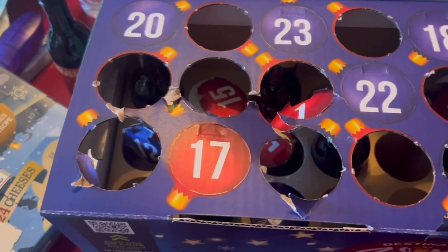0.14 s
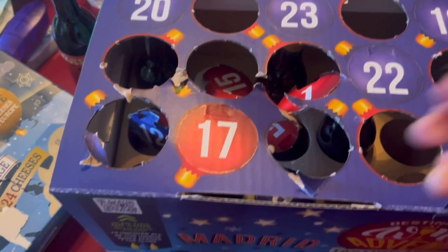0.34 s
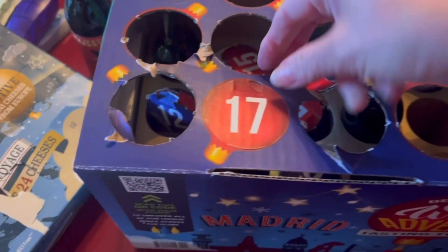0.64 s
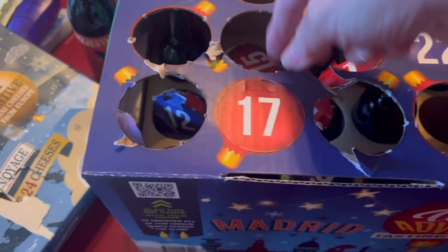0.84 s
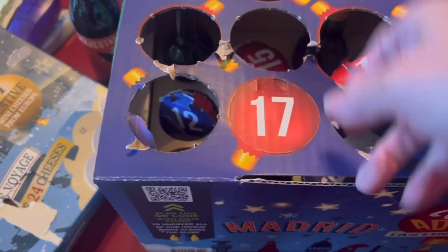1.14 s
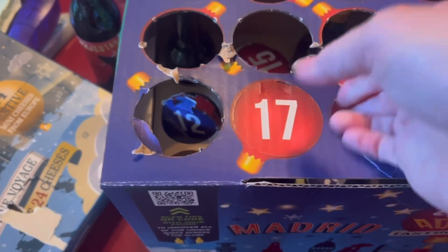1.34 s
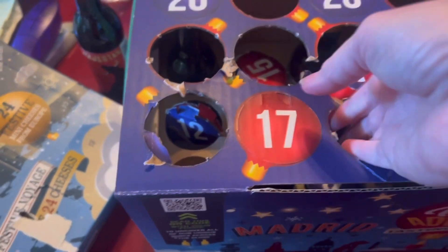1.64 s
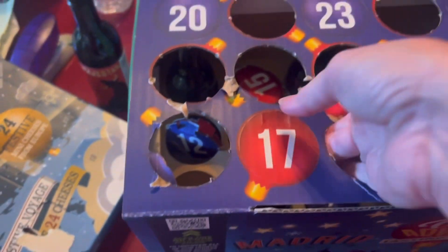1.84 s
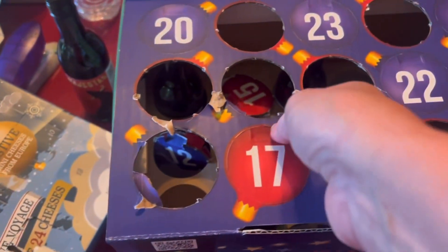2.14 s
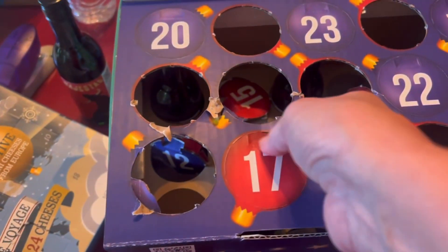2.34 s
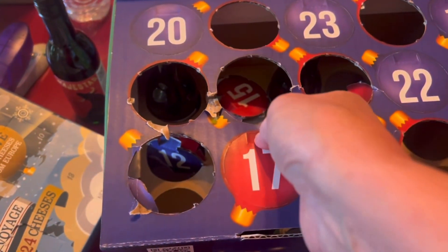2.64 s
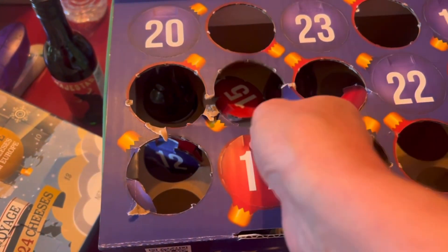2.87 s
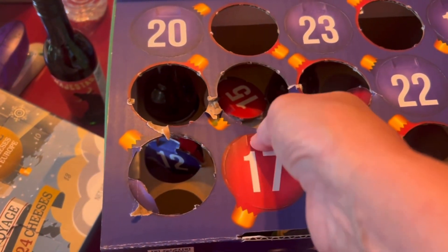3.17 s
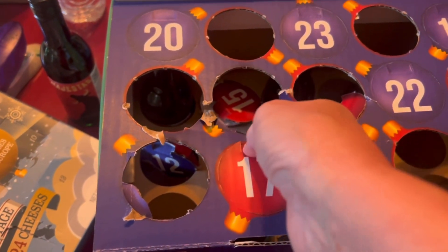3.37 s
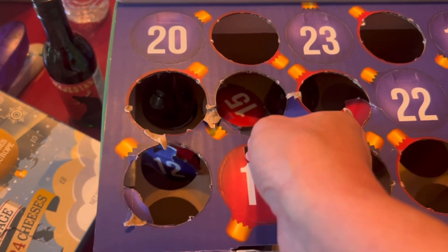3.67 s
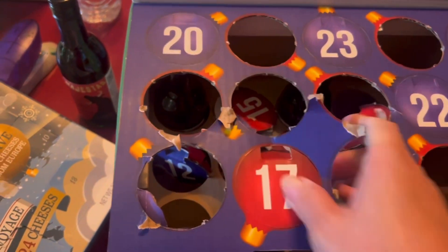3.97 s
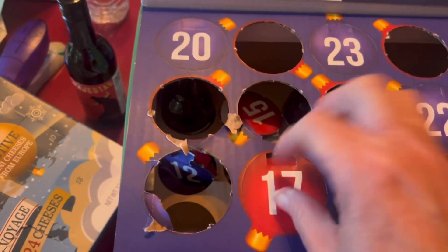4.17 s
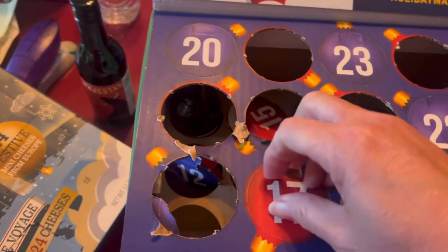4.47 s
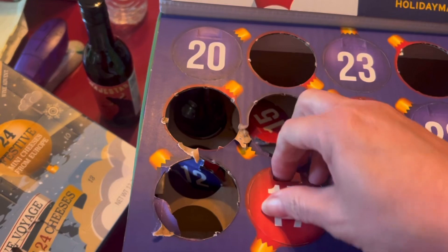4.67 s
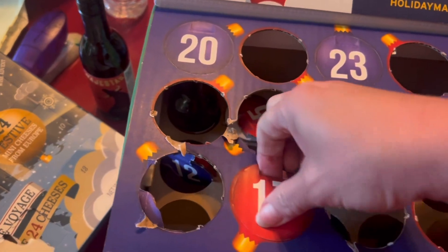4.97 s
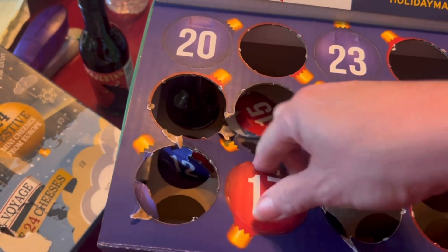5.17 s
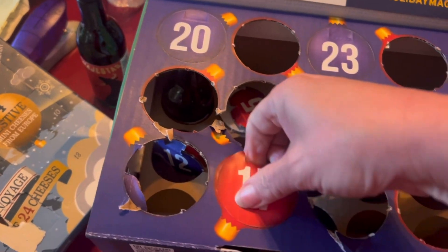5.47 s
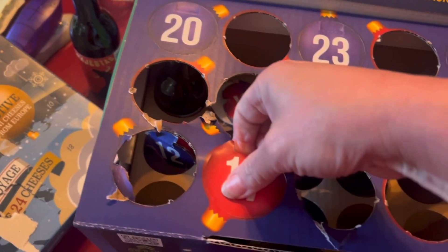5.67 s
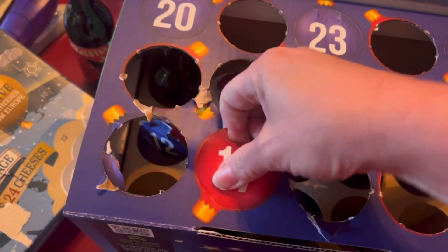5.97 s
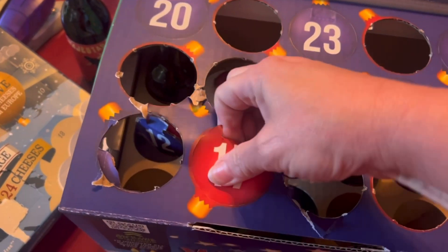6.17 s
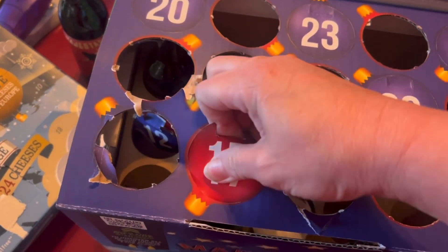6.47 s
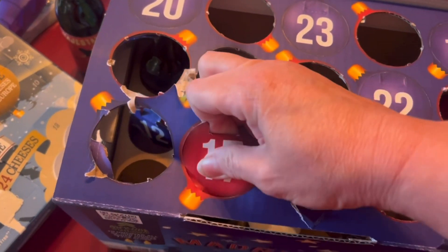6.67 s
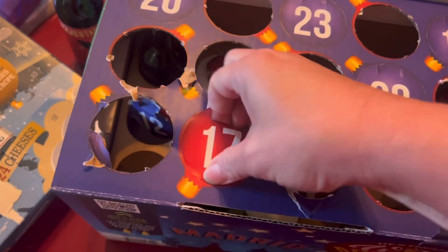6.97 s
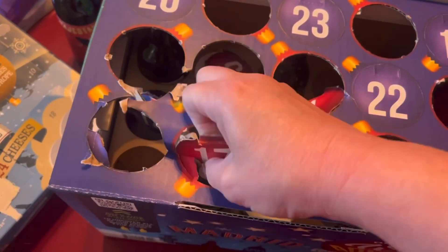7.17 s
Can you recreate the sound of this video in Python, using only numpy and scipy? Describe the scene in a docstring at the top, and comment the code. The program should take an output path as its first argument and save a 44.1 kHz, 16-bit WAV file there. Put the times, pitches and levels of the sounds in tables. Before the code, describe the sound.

Close-up picking at a stiff cardboard door: dry taps, papery scrapes, hollow thumps and tiny snaps, finishing in a sharp tearing burst.

```python
"""Fingers pick at the perforated door of a cardboard advent calendar, close to a phone in a small room.
Nails tick on the card and paper fibres snap, as noise bursts with a crack and a clack band.
Taps and pushes send falling bending waves through the hollow box, which rings and thumps.
Between the taps skin rubs, creaks and slides as random slips, and the perforation crackles,
until the door rips open at the end; a short room tail and a faint hush lie behind."""
import sys
import numpy as np
from scipy import signal
from scipy.fft import rfft, irfft, next_fast_len
from scipy.io import wavfile
from scipy.ndimage import map_coordinates

SR = 44100
rng = np.random.default_rng(int(sys.argv[2]) if len(sys.argv) > 2 else 0)


def transcribe(u):
    """Save the signal u as a 16-bit wav file named by the first command-line argument.

    u: samples, shape (n,) or (channels, n), limited to [-1, 1]; the rate is SR.
    q: integer samples, one column per channel.
    """
    v = np.clip(np.atleast_2d(u).T, -1, 1)
    q = np.round(v * 32767).astype(np.int16)
    wavfile.write(sys.argv[1], SR, q)


N = 322812

# a nail strikes the lid, ticking and knocking at once: start_s, contact_s, crack_db, clack_db,
# crack_tilt_db_per_octave, knock_db, knock_pitch_hz, box_thump_db
NAIL_TAPS = [(0.085, 0.0024, -57.5, -46.5, -3, -39.5, 685, -50),
             (0.5717, 0.0014, -42.5, -31.5, -13.5, -23.5, 329, -44),
             (0.684, 0.0014, -40, -51, -6, -41, 245, -40.5),
             (0.879, 0.00047, -41.5, -35.5, -9, -29.5, 402, -47),
             (0.933, 0.0014, -25, -34.5, -0.5, -26, 297, -36),
             (1.1588, 0.0015, -43, -31.5, -11, -23.5, 420, -58),
             (1.2764, 0.002, -25.5, -22, -3, -17.5, 384, -52),
             (1.356, .0014, -33, -30.5, -2, -27.5, 378, -50), (1.391, 0.006, -36, -34.5, -7, -33, 345, -47),
             (1.517, 0.0042, -71, -36, 4, -22.5, 330, -53),
             (1.64, 0.0048, -45.5, -43.5, -2, -38.5, 384, -62),
             (2.1918, 0.00062, -28, -29.5, -14.5, -31, 357, -42),
             (2.435, 0.00049, -43, -34, -2, -32.5, 395, -37),
             (2.625, 0.00083, -40.5, -37.5, -4.5, -24.5, 302, -50),
             (2.76, 0.00033, -35.5, -33.5, -4, -26, 330, -36),
             (3.051, 0.0041, -53.5, -50, -11, -36, 239, -50),
             (3.1217, 0.0021, -55, -44.5, -5, -44, 376, -39.5),
             (3.4791, 0.001, -24, -19, -4.5, -22.5, 387, -27),
             (3.874, 0.0011, -49.5, -46, -3, -35.5, 347, -45),
             (4.2055, 0.00068, -43.5, -40, -6, -32.5, 380, -44),
             (4.218, 0.002, -37, -39.5, 5, -42, 405, -55), (4.544, 0.0027, -41.5, -39, -6.5, -39, 304, -31),
             (4.681, 0.0084, -39.5, -34, -4.5, -23.5, 295, -66),
             (4.724, 0.002, -36.5, -37.5, -1.5, -30.5, 347, -55),
             (5.339, 0.0014, -50, -45, -23, -51, 358, -35), (6.42, .002, -44.5, -58, 5, -39, 386, -42),
             (6.569, 0.00073, -36.5, -51, 10, -38, 380, -54), (7.0387, 0.014, -38, -31, 3, -30, 402, -52)]
# paper fibres of the perforation break: start_s, length_s, crack_db, clack_db, crack_tilt_db_per_octave
FIBRE_SNAPS = [(0.513, 0.0032, -57, -47, -1), (0.872, 0.00096, -36.5, -53, 6),
               (1.502, .0025, -39, -54, 0.5), (2.158, 0.002, -40.5, -46.5, -2),
               (2.4153, 0.001, -40, -47.5, -5.5), (3.2504, 0.0012, -38.5, -52, -3),
               (3.922, .0026, -57, -44, 0), (4.0956, 0.00056, -48.5, -54, -9),
               (4.9635, 0.00036, -36.5, -49, 12), (4.9794, 0.00088, -36.5, -54, -2),
               (4.989, .0018, -40, -47, 0), (5.074, 0.0034, -42.5, -36, 1), (5.098, 0.0015, -43, -43, -10),
               (5.5843, 0.00075, -44, -60, 6.5), (5.7943, 0.00034, -43, -59, 0),
               (5.826, 0.0005, -23, -33, 2), (5.9825, .0003, -29, -66, 1.5),
               (6.2224, 0.00043, -40, -68, 2.5), (6.399, 0.0011, -38, -46, -10),
               (6.558, 0.004, -58, -45, -3), (6.615, 0.002, -34.5, -45.5, 8), (6.655, 0.0039, -38, -61, 4),
               (6.6784, 0.0016, -40, -42.5, -5), (6.855, 0.00044, -25, -46, 3.5),
               (6.983, 0.0014, -37.5, -53, 7), (7.0025, .0016, -43, -72, 8),
               (7.0196, 0.00038, -35, -68, -1), (7.0544, 0.00035, -19.5, -39, -3),
               (7.076, .0044, -24.5, -30.5, -4.5), (7.1285, .0009, -25, -20.5, -8),
               (7.1356, 0.0005, -19, -21, 3), (7.1411, 0.0011, -26.5, -25, -7)]
# the lid gives under a soft fingertip or springs back: start_s, knock_db, knock_pitch_hz, box_thump_db
LID_PUSHES = [(0.035, -48, 630, -59), (0.149, -57, 647, -69), (0.298, -58, 686, -53),
              (0.52, -44.5, 304, -39.5), (1.192, -24, 384, -32), (1.975, -56, 306, -34),
              (3.495, -22.5, 255, -18.5), (3.731, -39.5, 413, -54), (4.015, -36.5, 270, -23),
              (4.045, -31.5, 283, -23.5), (4.085, -28.5, 227, -30), (4.447, -41, 217, -70),
              (4.526, -39.5, 460, -40), (6.025, -29, 238, -30), (6.273, -38.5, 272, -40),
              (6.99, -40.5, 293, -36), (7.055, -28, 317, -37), (7.084, -23.5, 328, -23.5),
              (7.095, -27, 254, -39), (7.1409, -21.5, 794, -21), (7.145, -19, 367, -21),
              (7.156, -21.5, 286, -26)]
# a finger drags across the card or pulls at the door: start_s, length_s, rubbing_db, edge_crackle_db
FINGER_STROKES = [(0.068, 0.02, -44, -65), (0.51, 0.12, -52, -53.5), (0.665, 0.032, -47, -66),
                  (0.88, 0.51, -48, -60), (1.268, 0.14, -40.5, -50.5), (1.48, 0.042, -41, -53),
                  (1.6, 0.091, -47, -50.5), (1.765, 0.079, -42.5, -51.5), (1.91, 0.1, -46, -58.5),
                  (2.16, 0.057, -49.5, -57), (2.31, 0.15, -48.5, -57.5), (2.62, 0.091, -46.5, -53.5),
                  (2.76, 0.025, -48, -56), (2.865, 0.028, -46.5, -51), (2.95, 0.16, -72, -86),
                  (3.27, 0.043, -55, -61.5), (3.48, 0.053, -34, -52), (3.715, .07, -47, -70),
                  (3.83, 0.047, -46, -54), (3.868, 0.084, -36, -47.5), (3.98, 0.094, -38.5, -49.5),
                  (4.205, 0.052, -37.5, -54), (4.33, 0.044, -42.5, -54), (4.525, 0.089, -54, -54),
                  (4.68, 0.089, -36.5, -53.5), (4.84, 0.15, -52, -57), (5.06, .11, -49.5, -54.5),
                  (5.3, .11, -46, -64.5), (5.74, 0.22, -66, -57.5), (5.985, 0.049, -41.5, -49),
                  (6.085, 0.065, -53, -57), (6.265, 0.11, -53, -55.5), (6.37, .06, -46, -52.5),
                  (6.46, 0.036, -45.5, -55.5), (6.52, 0.059, -44.5, -45), (6.61, 0.069, -43, -47.5),
                  (6.7, 0.042, -52, -53.5), (6.76, .11, -44.5, -51.5), (6.99, 0.057, -45.5, -56.5),
                  (7.04, 0.062, -30.5, -35), (7.137, 0.0083, -23, -35), (7.19, 0.04, -37, -45),
                  (7.28, 0.05, -41.5, -48)]
# a fingertip slides over the printed face: start_s, length_s, level_db, final_pitch_ratio
FINGER_SLIDES = [(0.898, .37, -48.5, 1.06), (2.431, 0.3, -63.5, 0.69), (5.18, .3, -63.5, .82)]
# resonances of the lid: centre_hz, width_hz, level_db
LID_MODES = [(208, 11, -44), (298, 25, -3), (330, 40, -13), (385, 76, -13), (450, 35, -36), (565, 71, 11),
             (765, 33, -13.5)]
# treble of breaking fibres and crackling edges: frequency_hz, density_db_per_hz
CRACK_COLOUR = [(1800, -30), (2800, -8.5), (3900, -11), (5200, 1.5), (6300, -4), (7800, 0.5), (10000, -3),
                (12000, 4), (14500, -5), (16500, -7.5)]
# midrange of a struck or torn patch of card: frequency_hz, density_db_per_hz
CLACK_COLOUR = [(450, -19), (850, 7), (1080, 0.5), (1350, 6), (1650, 4.5), (1850, -0.5), (2250, 4),
                (2800, -9), (4000, -1)]
# midrange rasp of the skin: frequency_hz, density_db_per_hz
RASP_COLOUR = [(500, -17), (850, 2.5), (1100, -3.5), (1450, -1), (1800, -3), (2250, 1), (2900, -2.5),
               (3800, 2), (5500, -13)]
# low rubbing of the lid: frequency_hz, density_db_per_hz
RUB_COLOUR = [(100, -45), (180, 1.5), (330, 3.5), (450, -2), (560, -8), (700, -11), (1200, -88)]
# slow flexing of the box: frequency_hz, density_db_per_hz
FLEX_COLOUR = [(18, -96), (35, -10), (55, -0.5), (75, -5.5), (92, 4), (115, 2), (150, 0), (240, -13)]
# skin on smooth print: frequency_hz, density_db_per_hz
HISS_COLOUR = [(1500, -5), (2700, 9.5), (4800, 5.5), (5700, 12.5), (6400, 11), (7100, -7), (8200, 3.5),
               (9500, -32), (16000, -5)]
# still room air: frequency_hz, density_db_per_hz
AIR_COLOUR = [(30, 0), (55, 1.5), (100, -0.5), (240, -2.5), (400, -8), (900, -21.5), (1400, -22),
              (1950, -14), (2500, -33), (4000, -32.5), (8000, -41.5), (15000, -48)]
# decay of the room: frequency_hz, t60_s
ROOM_DECAY = [(100, 0.35), (400, 0.19), (2000, 0.27), (6000, 0.27), (15000, 0.059)]
# left-right likeness when both input rows are equally strong: frequency_hz, correlation (0 to 1)
STEREO_LIKENESS = [(100, .99), (500, .9), (1400, .88), (2400, .88), (3500, .55), (5300, .25), (7500, .9),
                   (15000, .92)]
# level balance of the phone's stereo filter: frequency_hz, left_minus_right_db
STEREO_BALANCE = [(60, 0), (200, .8), (300, 0), (650, -.5), (1300, 3), (3300, 2.5), (5300, 9), (7500, .6),
                  (15000, -.4)]
# phase balance of the phone's stereo filter: frequency_hz, left_lead_radians
STEREO_LEAD = [(300, 0), (520, -.3), (780, .5), (1100, 0), (1640, -.2), (2500, .4), (3500, 1.3), (4600, 1.6),
               (6400, -.35), (7500, -.65), (8500, -1.4), (10000, -3.1), (12000, -4.7), (16000, -8.3)]

LEAD_IN_DB, LEAD_IN_S = -20, .0011  # a brief soft swell of noise leads into each snap
USUAL_CLACK_DB = -35  # a tap of middling strength
SPOT_DB = 3.0  # ripple of the colour from one spot on the card to the next
ATTACK_S, RELEASE_S = 0.006, 0.016  # a stroke takes hold, and dies away once the finger stops
HOLD_FROM_S, HOLD_RUB_DB, HOLD_CRACKLE_DB = 0.9, -58.5, -66  # between strokes the hand rests on the card
FLEX_LAG_S = 0.025  # the box gives a little after the finger drags
RASP_DB = -4  # the rasp of the skin, against rubbing and crackle
RASP_EDGE_SHARE = 0.45  # how far the rasp follows the crackling edges rather than the rubbing
SLIDE_SAG = .1  # share by which a slide's hiss starts below its final pitch
TOP_HZ = 16300  # band limit of the phone


def snaps(rows, clack_hz, deepen=0, clack_octaves=0.79, spiky=0.98, flutter_db=-21, flutter_s=0.0093,
          size=2048):
    """Impulsive fracture: each snap is a tiny avalanche of fibres, coloured by its own spot on the card."""
    early_s = .006
    out = np.zeros((2, N))
    t = np.arange(size) / SR - early_s
    after = np.maximum(t, 0)
    spot_hz = np.geomspace(700, 16000, num=40)
    for s, length, crack_db, clack_db, tilt_db in rows:
        length = max(length, 2e-4)
        onset = 1 - np.exp(-after / (.15 * length))
        avalanche = onset * np.exp(-after / (1.8 * length))
        # a brief soft swell of noise leads into each snap, and the freed edge flutters after it
        lead_in = amp(LEAD_IN_DB) * np.exp(-np.abs(t) / LEAD_IN_S)
        flutter = amp(flutter_db) * np.exp(-after / flutter_s)
        envelope = avalanche + np.where(t < 0, lead_in, flutter)
        spikes = np.exp(spiky * rng.standard_normal(size))
        burst = envelope * rng.standard_normal((2, size)) * spikes
        spot = np.column_stack([spot_hz, SPOT_DB * rng.standard_normal(len(spot_hz))])
        # a harder blow moves a wider patch of card, which clacks lower: deepen is in octaves per dB
        patch_hz = clack_hz * 2 ** (deepen * (USUAL_CLACK_DB - clack_db))
        crack = filtered(burst, lambda hz: amp(along(spot, hz) + tilt_db * np.log2(1 + hz / clack_hz)))
        clack = filtered(burst, lambda hz: amp(along(spot, hz)) * hump(hz, patch_hz, clack_octaves))
        add(out, s - early_s, amp(crack_db) * blow(coloured(crack, CRACK_COLOUR)))
        add(out, s - early_s, amp(clack_db) * blow(coloured(clack, CLACK_COLOUR)))
    return out


def loose_fibres(crackling, over_db=10, clack_db=-7, scatter_db=7, length_s=0.00084, count=64):
    """Random fracture under load: faint snaps whose level follows the crackle; rows like FIBRE_SNAPS."""
    # one random moment in each of count equal spans
    times = (np.arange(count) + rng.random(count)) / count * (N - 1) / SR
    levels = crackling[(times * SR).astype(int)] + over_db - scatter_db * rng.random((2, count))
    return [(s, length_s, crack, mid + clack_db, 0) for s, crack, mid in zip(times, *levels)]


def knocks(rows, knock_db=1, ring_db=-11, octaves=0.51, cycles=2.1, box_hz=91, ring_t60=0.079, size=16384):
    """Dispersion: bending waves run slower at low pitch, so a knock sweeps down; lid rings, box thumps."""
    out = np.zeros(N)
    t = np.arange(size) / SR
    hz = np.fft.rfftfreq(size, 1 / SR)
    lid = sum(amp(db) / (1 + (2 * (hz - f) / width) ** 2) for f, width, db in LID_MODES)
    for s, db, pitch_hz, thump_db in rows:
        # every frequency arrives a fixed number of its own cycles late
        sweep = np.exp(-2j * np.pi * (cycles * np.log(hz + 1) + rng.random()))
        # the near edge sends the wave straight back
        bounce = 1 + 0.5 * np.exp(-2j * np.pi * hz * 2 / pitch_hz)
        wave = irfft(hump(hz, pitch_hz * .92, octaves) * sweep * bounce)
        # later reflections from the edges of the lid pile up in its resonances
        echoes = rng.standard_normal(size) * amp(-60 * t / ring_t60)
        ring = irfft(rfft(echoes) * lid * hump(hz, pitch_hz * .9, 0.55) * sweep)
        # the thump: a swept low band and a tone of the box that swells and fades
        sway_hz = box_hz * np.exp(0.027 * rng.standard_normal())
        sway = irfft(hump(hz, sway_hz, 0.65) * sweep)
        air = np.sin(2 * np.pi * box_hz * t) * amp(-60 * t / 0.079) * (1 - np.exp(-t / 0.025))
        add(out, s, amp(db + knock_db) * blow(wave) + amp(db + ring_db) * blow(ring))
        add(out, s, amp(thump_db) * blow(0.83 * blow(sway) + blow(air)))
    return out


def fingers(rubbing, crackling, flex_db=-4, rub_smooth=1.0, crackle_smooth=0.69):
    """Stick-slip friction: small slips of the skin flex the box, rub the lid and crackle the torn edges."""
    flexing = np.interp(np.arange(N) - FLEX_LAG_S * SR, np.arange(N), rubbing)
    rasping = rubbing + RASP_EDGE_SHARE * (crackling - rubbing)
    noise = lambda: rng.standard_normal((2, N))
    catches = grains(rate=75, spread_db=4, life_s=.002)
    fibres = grains(rate=300, spread_db=3.5, life_s=.0006)
    # the creaks swell whenever the skin catches
    creaking = (.7 * noise() + np.array([creaks(), creaks()])) * (1.1 + catches)
    edges = noise() * (crackle_smooth + 0.47 * catches + 0.11 * fibres)
    flex = amp(flexing + flex_db) * unit(coloured(noise(), FLEX_COLOUR, size=16384))
    rub = amp(rubbing) * unit(coloured(noise() * (rub_smooth + catches), RUB_COLOUR, size=4096))
    rasp = amp(rasping + RASP_DB) * unit(coloured(creaking, RASP_COLOUR))
    crackle = amp(crackling) * unit(coloured(edges, CRACK_COLOUR))
    return flex + rub + rasp + crackle


def effort(waver_db=1.5, waver_rate=30):
    """Power summation: rubbing and crackle in dB, strokes over a resting hand, with unsteady pressure."""
    moves = FINGER_STROKES + [(HOLD_FROM_S, N / SR, HOLD_RUB_DB, HOLD_CRACKLE_DB)]
    power = sum((amp([[rub_db], [crackle_db]]) * stroke(s, length)) ** 2
                for s, length, rub_db, crackle_db in moves)
    return 10 * np.log10(power + 1e-12) + waver_db * wander(waver_rate)


def stroke(start_s, length_s):
    """Amplitude envelope: linear attack, hold and exponential release of one movement of a finger."""
    t = np.arange(N) / SR - start_s
    release = np.exp(-np.clip((t - length_s) / RELEASE_S, 0, 30))
    return np.clip(t / ATTACK_S, 0, 1) * release


def grains(rate, spread_db, life_s):
    """Shot noise: random slips per second, of uneven size, each decaying exponentially; rms 1."""
    sizes = amp(spread_db * np.minimum(rng.exponential(size=N), 3))
    slips = (rng.random(N) < rate / SR) * sizes
    return unit(signal.lfilter([1], [1, -np.exp(-1 / (life_s * SR))], slips))


def creaks(pitch_hz=1750, drift=0.35, spread=0.24, spread_db=3, cycles=3.5, count=4000, size=256):
    """Damped oscillation: each catch of skin shakes a patch of card; neighbours share pitch; rms 1."""
    start = rng.integers(0, N - size, (count, 1))
    patch = drift * wander(35)[start]
    pitches_hz = pitch_hz * np.exp(patch + spread * rng.standard_normal((count, 1)))
    phase = pitches_hz * np.arange(size) / SR  # in cycles
    strength = amp(spread_db * np.minimum(rng.exponential(size=(count, 1)), 3))
    rings = strength * np.sin(2 * np.pi * phase) * np.exp(-phase / cycles)
    return unit(np.bincount((start + np.arange(size)).ravel(), rings.ravel(), N))


def slides():
    """Sliding friction: skin hisses on smooth print, loudest midway, rising in pitch along the way."""
    out = np.zeros((2, N))
    for s, length, db, ratio in FINGER_SLIDES:
        loudness = np.sin(np.linspace(0, np.pi, int(length * SR)))
        # a fixed noise texture is read ever faster, which raises its pitch
        travel = np.cumsum(ratio * (1 - SLIDE_SAG * np.linspace(1, 0, len(loudness))))
        texture = unit(coloured(rng.standard_normal((2, SR)), HISS_COLOUR))
        hiss = np.array([map_coordinates(channel, [travel]) for channel in texture])
        add(out, s, amp(db) * loudness * hiss)
    return out


def room(x, count=3):
    """Reverberation: three random decaying noise tails, taken in turn every 0.3 s for variety."""
    out = np.zeros((2, N))
    turn = np.arange(N) / SR / .3
    for k in range(count):
        hz, t, z = signal.stft(rng.standard_normal((2, SR // 3)), SR, nperseg=256)
        decay = amp(-60 * t / along(ROOM_DECAY, hz)[:, None])
        tail = signal.istft(z * decay, SR, nperseg=256)[1]
        # the tail starts 1/300 s late
        tail = np.pad(tail / np.linalg.norm(tail[0]), ((0, 0), (SR // 300, 0)))
        active = turn.astype(int) % count == k
        out += signal.fftconvolve(x * active, tail, axes=1)[:, :N]
    return out


def ambient(air_db=-57):
    """Stationary noise: the faint steady hush of the room."""
    return amp(air_db) * unit(coloured(rng.standard_normal((2, N)), AIR_COLOUR, size=8192))


def stereo_filter(pair):
    """Interchannel coherence: the phone's stereo filter sends row one to both channels alike and row two as
    their difference."""
    turn = lambda hz: np.arccos(np.clip(along(STEREO_LIKENESS, hz), 0, 1)) / 2
    mid, side = filtered(pair, lambda hz: np.array([np.cos(turn(hz)), np.sin(turn(hz))]))
    # half of the level and phase balance on each channel, in opposite senses
    left = lambda hz: amp(along(STEREO_BALANCE, hz) / 2) * np.exp(.5j * along(STEREO_LEAD, hz))
    return filtered(np.array([mid + side, mid - side]), lambda hz: np.array([left(hz), 1 / left(hz)]))


def amp(db):
    """Level definition: decibels to amplitude gain."""
    return 10 ** (np.asarray(db) / 20)


def unit(x):
    """Power normalisation: scale each row to rms 1."""
    return x / np.sqrt(np.mean(x ** 2, axis=-1, keepdims=True) + 1e-20)


def blow(x):
    """Energy normalisation: scale a short sound to the energy of 10 ms at rms 1."""
    return unit(x) * np.sqrt(SR / 100 / x.shape[-1])


def along(points, hz):
    """Logarithmic interpolation: (Hz, value) points read on a log-frequency axis."""
    f, v = np.transpose(points)
    return np.interp(np.log(hz + 1), np.log(f + 1), v)


def filtered(x, response):
    """Linear filtering: the spectrum of x times a complex response of frequency."""
    size = x.shape[-1]
    m = next_fast_len(size + 4096, True)
    return irfft(rfft(x, m) * response(np.fft.rfftfreq(m, 1 / SR)), m)[..., :size]


def coloured(x, spectrum, size=2048):
    """Minimum phase: causal colouring that falls away steeply outside the end points of the spectrum."""
    hz = np.fft.rfftfreq(size, 1 / SR)
    closed = [(spectrum[0][0] / 2, -70)] + list(spectrum) + [(spectrum[-1][0] * 2, -70)]
    # folding the cepstrum onto positive time makes the filter causal
    cepstrum = irfft(np.log(amp(along(closed, hz))))
    cepstrum[1:size // 2] *= 2
    cepstrum[size // 2 + 1:] = 0
    impulse = irfft(np.exp(rfft(cepstrum)))
    return signal.fftconvolve(x, impulse[None], axes=1)[:, :x.shape[1]]


def hump(hz, centre_hz, octaves):
    """Band-pass weighting: a bell-shaped band on a log-frequency axis."""
    return np.exp(-.5 * (np.log2((hz + 1) / centre_hz) / octaves) ** 2)


def wander(rate):
    """Band-limited fluctuation: a smooth random curve, rate knots a second."""
    return map_coordinates(rng.standard_normal(2 ** 11), [np.arange(N) * rate / SR], mode="wrap")


def add(track, s, x):
    """Superposition: mix x into the track at time s."""
    start = max(round(s * SR), 0)
    part = track[..., start:start + x.shape[-1]]
    part += x[..., :part.shape[-1]]


def scene():
    """Direct and reverberant field: taps, snaps and rubbing; walls answer what the card sends sideways."""
    rubbing, crackling = effort()
    nails = snaps([tap[:5] for tap in NAIL_TAPS], clack_hz=1390, deepen=0.008)
    tearing = snaps(FIBRE_SNAPS + loose_fibres(crackling), clack_hz=1990)
    ticks = nails + tearing
    tap_knocks = [(s, *knock) for s, contact, crack, clack, tilt, *knock in NAIL_TAPS]
    lid = knocks(tap_knocks + LID_PUSHES)
    hand = fingers(rubbing, crackling) + slides()
    # swapped rows: the sideways part feeds the common row of the room
    wet = room(amp(-18) * ticks[::-1] + amp(-9.5) * lid + amp(-7.0) * hand[::-1])
    lid_pair = np.array([lid, np.zeros(N)])  # the lid sounds alike in both channels
    return stereo_filter(ticks + hand + lid_pair + wet + ambient())


def record(dry):
    """Saturation and band limiting: the phone rounds off the sharpest peaks and cuts the top treble."""
    rounded = dry / (1 + np.abs(dry / .85) ** 6) ** (1 / 6)
    return filtered(rounded, lambda hz: 1 / (1 + (hz / TOP_HZ) ** 160))


dry = scene()
out = record(dry)
transcribe(out)
```